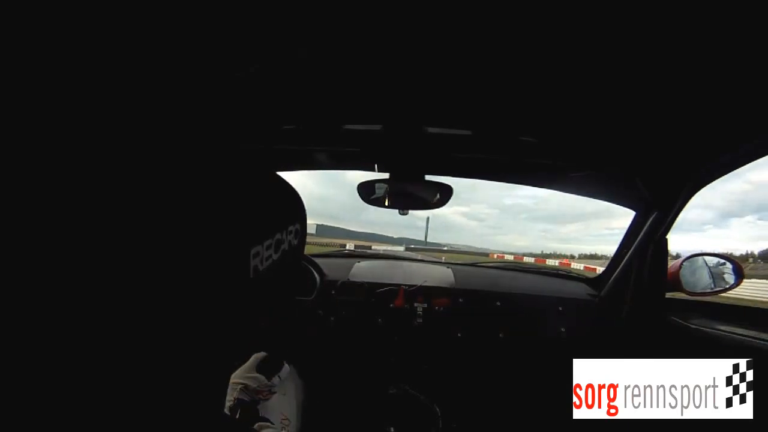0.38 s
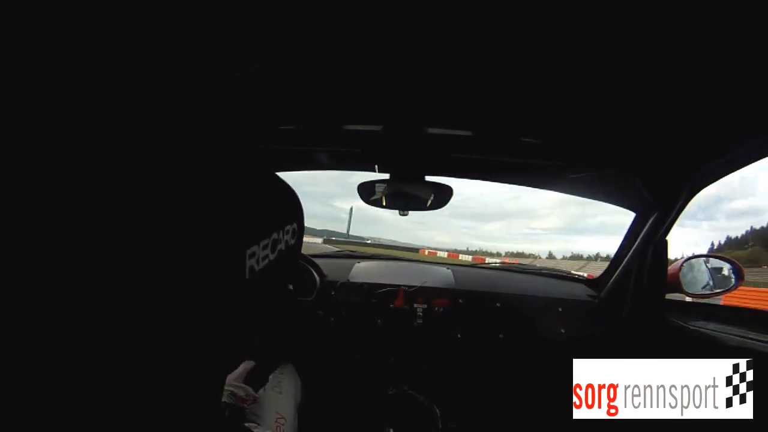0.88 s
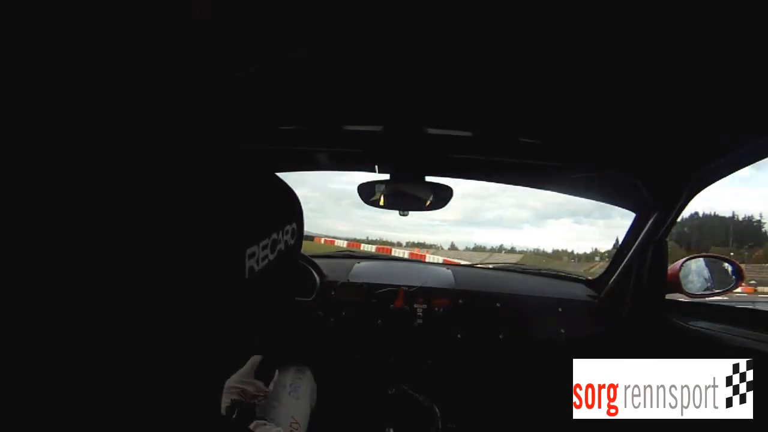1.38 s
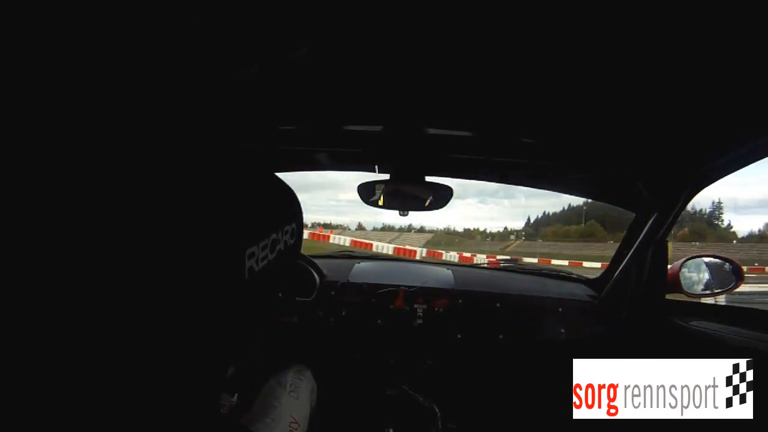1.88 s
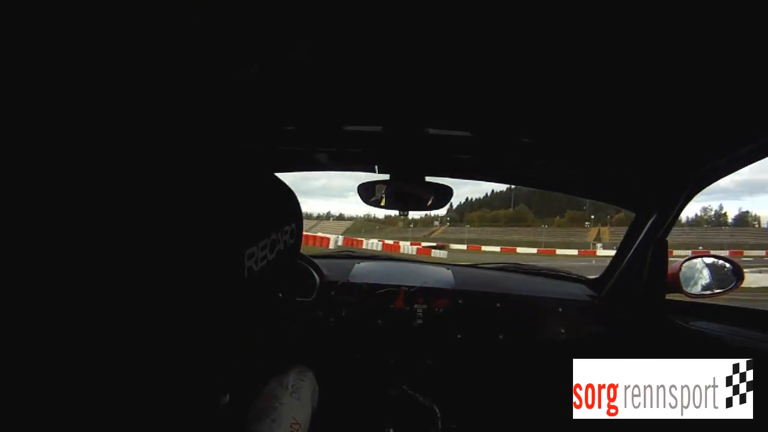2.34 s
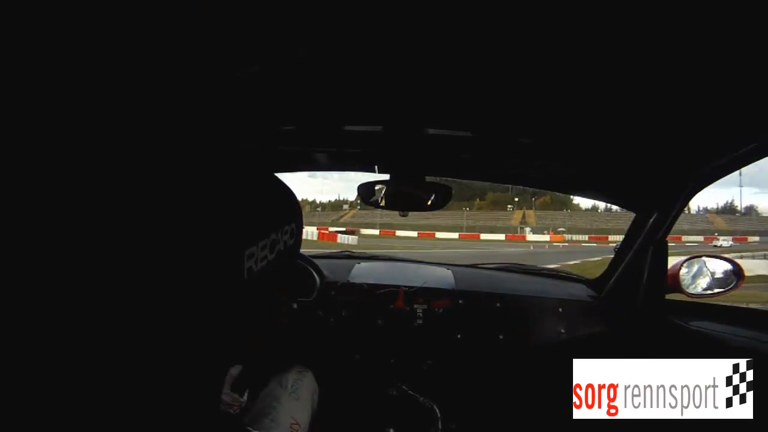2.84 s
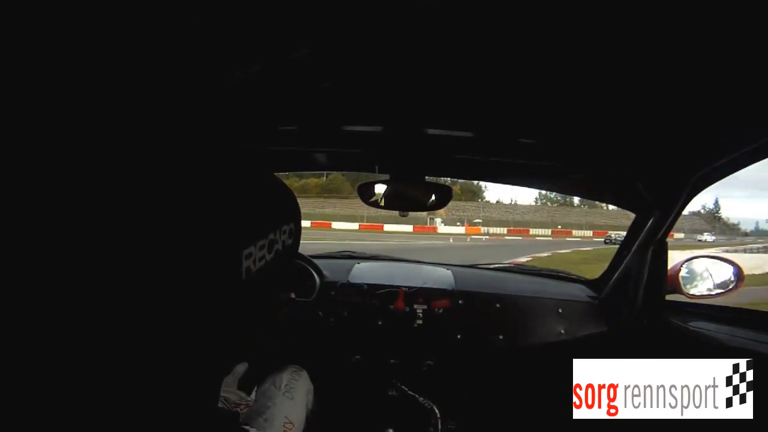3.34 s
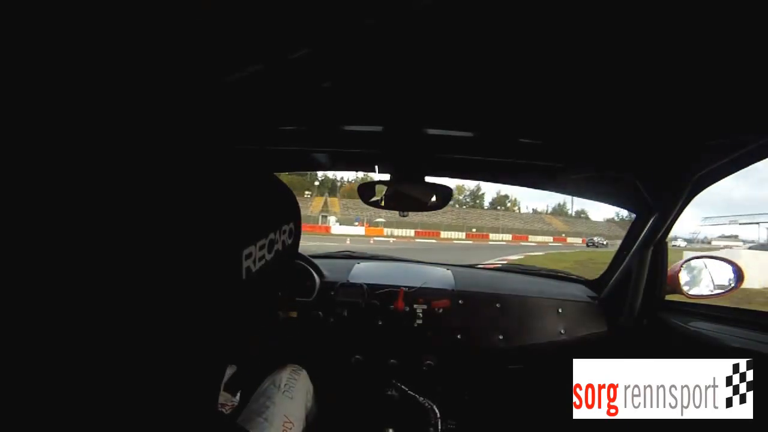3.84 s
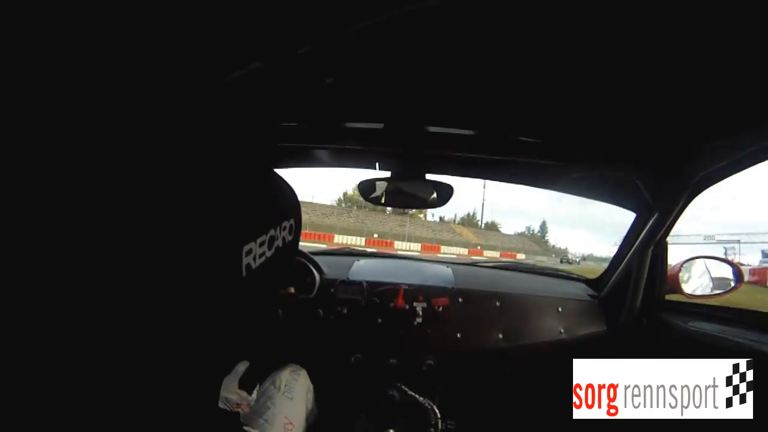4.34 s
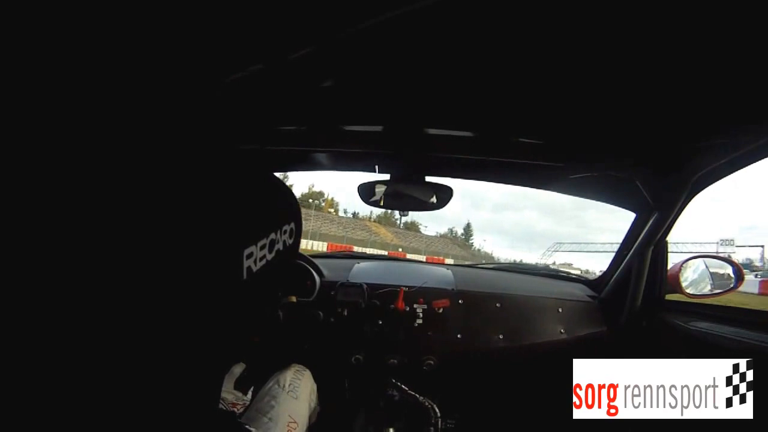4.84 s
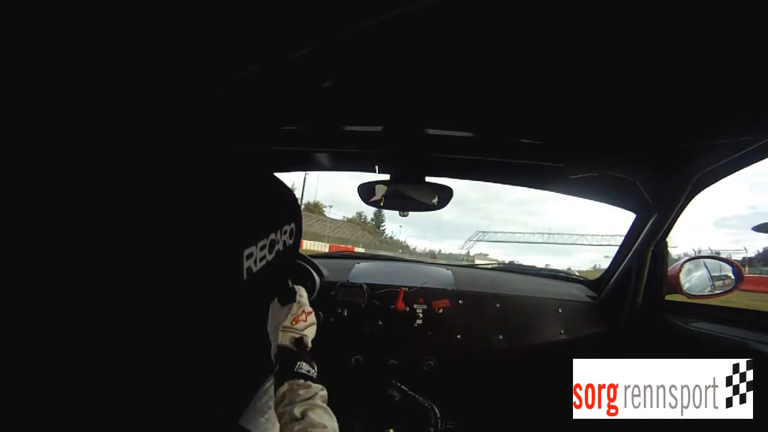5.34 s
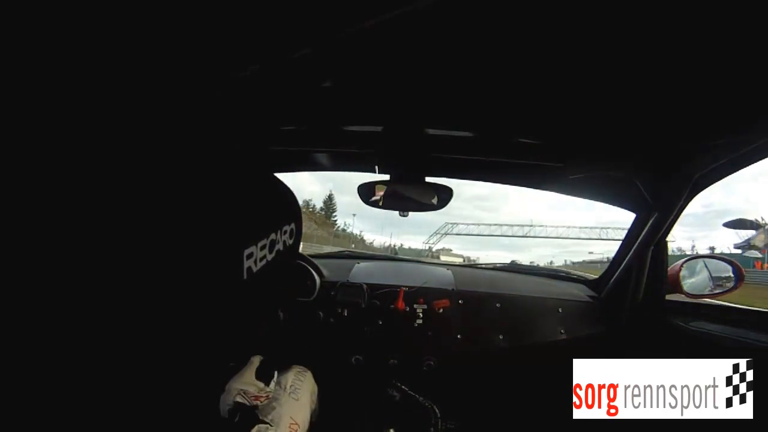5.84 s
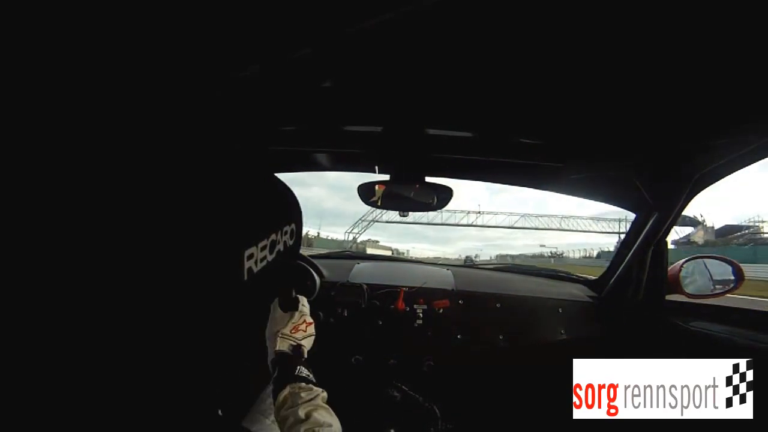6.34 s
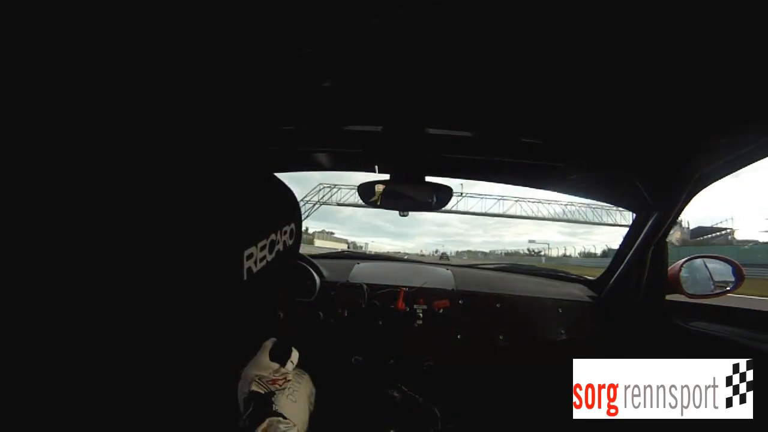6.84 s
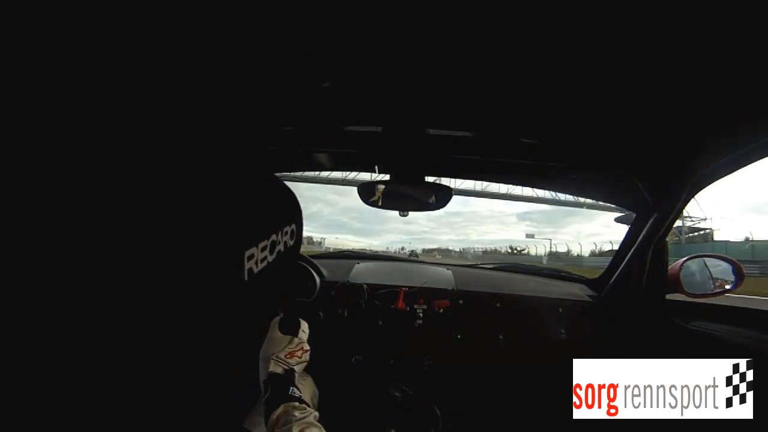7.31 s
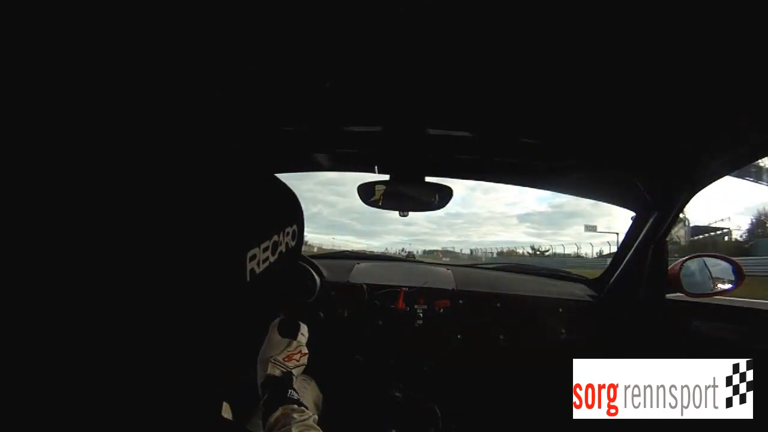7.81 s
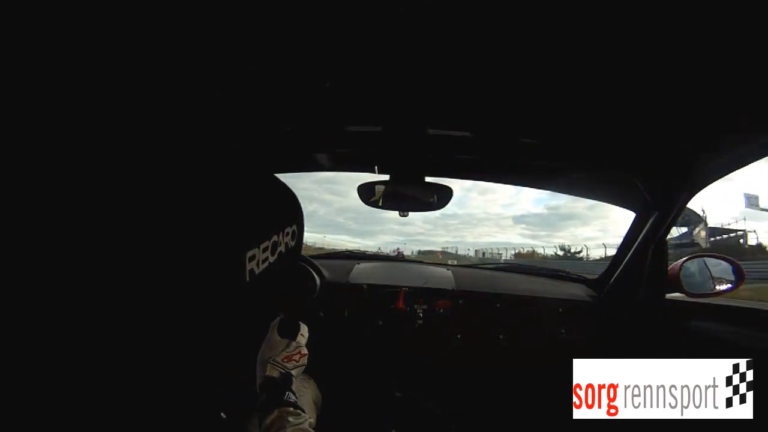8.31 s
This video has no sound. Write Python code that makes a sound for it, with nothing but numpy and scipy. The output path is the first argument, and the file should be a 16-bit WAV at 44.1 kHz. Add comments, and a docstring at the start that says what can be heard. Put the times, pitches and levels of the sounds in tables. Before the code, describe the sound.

Inside a stripped racing car, a small microphone with levelled loudness and gritty treble picks up a continuous engine. From 0 to 0.6 s the low, buzzing firing note falls in pitch, briefly wobbling upward, while its boom cuts out in jolts and kerb rumble thuds. It sinks further until about 1.8 s, duller, over road roar, with sparse faint trim ticks between 0.95 and 2.3 s. From 2 s the throttle eases open; pitch rises slowly and the tone fills out, with kerb bumps around 4.5 to 4.8 s. At 5.1 s it flares brighter and raspier, peaking near 5.45, then drops abruptly by 5.75. It surges again to 6.5 s, dips around 6.9, recovers, wavers near 7.5, and climbs to a loud metallic howl at 8.7 s. Gear whine follows the revs; hiss swells with load, and a very faint steady electrical tone sits underneath.

```python
"""Inside a stripped racing car: the engine falls on the overrun into a bend, its boom dropping out in jolts.
Loose trim ticks, then the throttle opens and the engine pulls, flares, dips and climbs out of the bend.
Firing pulses boom as clean orders and ring the panel and intake resonances; a gear whines along with the revs.
Filtered noise makes road roar, kerb rumble and combustion hiss, and a faint electrical tone holds steady. A small
camera evens the level and holds each sample at a low rate, which mirrors the sound into the treble."""
import sys
import numpy as np
from scipy import signal
from scipy.fft import rfft, irfft, next_fast_len
from scipy.io import wavfile
from scipy.ndimage import uniform_filter1d

SR = 44100
rng = np.random.default_rng(int(sys.argv[2]) if len(sys.argv) > 2 else 0)


def natural_amplitude(level_db):
    """Convert a level in decibels to a linear amplitude factor, elementwise."""
    exponent = np.asarray(level_db, float) / 20
    return 10 ** exponent


def master_out(mix):
    """Clip the mix to full scale and print it as 16-bit PCM to the path in sys.argv[1]."""
    frames = np.transpose(np.atleast_2d(mix))
    ceiling = np.clip(frames, -1, 1)
    pcm = np.round(ceiling * 32767).astype(np.int16)
    wavfile.write(sys.argv[1], SR, pcm)


N = 383229   # length [samples]

# Levels of all sources are those ahead of the gain control.
# noise colours, each scaled as a whole afterwards: (frequency [Hz], relative density [dB per Hz])
RUMBLE_COLOUR = [(20, 4), (40, -3), (70, 1), (110, 3), (180, 2), (300, -9.5), (500, -9), (800, -31)]
ROAR_COLOUR = [(120, -22), (250, -1), (500, -0.5), (800, -2), (1050, -8.5), (1300, -14), (1700, -19.5),
               (2200, -41)]
HISS_COLOUR = [(1200, -8.5), (1800, -4.5), (2500, -0.5), (3100, -6), (3600, -5), (4500, -14), (5300, -16),
               (6200, -14), (7200, -15.5), (8500, -16.5), (11000, -21.5)]
# kerbs and bumps under the wheels: (middle [s], half length [s], rumble swell [dB], roar swell [dB])
BUMPS = [(0.0, 0.13, 10, 2), (.39, 0.11, 12, 1), (.52, 0.09, 9, 0), (2.03, .12, 5, 3), (3.55, 0.25, 3, 3),
         (4.5, 0.11, 10, 1.5), (4.75, 0.18, 10.5, 0.5), (5.55, 0.054, 3, 0), (6.5, 0.049, 3, -1),
         (7.1, .2, 2, 0), (7.75, 0.22, 5, -1.5)]
# trim rattling: (time [s], relative strike level [dB])
TICKS = [(0.9502, -28), (1.1383, -30), (1.9047, -27), (2.0852, -24), (2.2711, -25.5)]
# resonances of the struck trim: (frequency [Hz], relative level [dB], 60 dB decay time [s])
TICK_MODES = [(1698, -11, .012), (2699, 4, 0.017), (3383, -1, 0.056), (4030, -7, 0.0093)]
# panel and intake resonances: (frequency [Hz], width [Hz], relative level [dB])
CABIN_MODES = [(985, 67, 12.5), (1116, 180, 1.5), (1222, 43, 5.5), (1446, 86, -4.5), (1634, 36, 0.5),
               (1966, 20, 3.5), (2146, 12, 3), (2278, 26, 5), (2456, 34, -3.5), (2608, 31, 0.5),
               (2723, 10.3, 2.5), (2876, 81, -3.5), (3236, 42, -4), (3640, 200, -20)]
# engine load: (time [s], combustion hiss [dB], metallic ring of the firing pulses [dB])
LOAD = [(0.0, -43.5, -39), (0.22, -49.5, -49), (0.36, -46.5, -44), (0.52, -48, -46), (0.62, -48, -53),
        (1.16, -51.5, -51.5), (1.8, -53.5, -51.5), (2.1, -47, -61), (2.17, -50, -50), (2.42, -53, -58),
        (2.78, -51.5, -48), (3.65, -45.5, -42.5), (3.8, -47.5, -42.5), (4.35, -46.5, -40), (4.7, -41, -38),
        (4.82, -41, -35), (4.96, -46, -41), (5.13, -43.5, -30.5), (5.35, -40, -27.5), (5.56, -39.5, -28.5),
        (5.63, -43.5, -33), (5.74, -46.5, -39), (5.93, -44.5, -32.5), (6.1, -43, -30.5), (6.5, -36, -24),
        (6.72, -39.5, -28), (6.85, -38, -26), (6.95, -39.5, -27.5), (7.43, -36.5, -25.5), (7.55, -40, -27),
        (7.9, -35.5, -23.5), (8.2, -39, -30), (8.69, -39, -25.5)]
# engine speed: (time [s], firing rate [Hz])
REVS = [(0,118),(.2,111.3),(.33,102.2),(.41,110.7),(.5,103.8),(.63,98.9),(.84,91.7),(.96,89.4),(1.44,90),(1.55,86.6),(1.74,85.3),(2.0,86.85),(2.18,88.54),(2.58,88.9),(2.88,94),(3.05,94.25),(3.25,98.1),(3.36,97.25),(3.46,101.4),(3.65,101.7),(3.76,103.3),(4.25,107.2),(4.45,110.9),(4.55,109),(4.75,114.7),(5.03,115.3),(5.12,123.1),(5.2,126),(5.28,131.5),(5.4,132.2),(5.46,139.1),(5.77,118.4),(6.07,120.7),(6.37,138.3),(6.46,142.1),(6.6,141.3),(6.9,132),(7.12,139.2),(7.38,143.1),(7.5,140),(7.65,142),(8.15,148.9),(8.69,156.9)]
# engine state; 0 overrun, 1 part throttle, 2 full throttle, 3 full with the intake switched for high revs;
# anything above 3 sounds like 3: (time [s], state [0 upward])
THROTTLE = [(0, 0), (1.89, 0), (1.96, 0.43), (2.08, 0.7), (2.18, 1.0), (2.72, 1.0), (2.8, 1.3), (3.1, 1.34),
            (3.22, 2.0), (7.8, 2.0), (8.0, 3.0), (8.69, 9)]
# orders 1 to 9 of the firing rate, at 120 Hz: (overrun [dB], part throttle [dB], full throttle [dB],
# full with switched intake [dB], growth with revs [dB per octave])
ORDERS = [(-11.5, -16, -12.5, -22, 5), (-20.7, -13.9, -17, -12, -8.2), (-36.5, -45, -23, -27, 10),
          (-44, -38, -25, -29.5, 1), (-41.5, -26, -28, -29, -3), (-63, -57.5, -56.5, -37, -22.5),
          (-55, -38, -32.5, -32, 24.5), (-65, -61, -49, -50, -10.5), (-59.5, -64, -38.5, -32, -10)]
# booms and dead spots at the seat, met by each order as it sweeps:
# (frequency [Hz], half width [Hz], level change [dB])
SEAT = [(122.0, 5.7, 4.5), (164, 25.2, -21.5), (175.2, 14.7, 13), (198.4, 3.4, -12.5), (225.4, 11.8, -12.5),
        (322.6, 24, 4.5), (375.6, 16.5, -6.5), (440.7, 3.7, -3), (460, 14, 4.5), (484.7, 7.3, -11.5),
        (530, 6.6, 5), (591, 7.7, 11), (603, 1.2, -9), (666.4, 5.8, -12.5), (691.4, 13, 11.5),
        (713.7, 8.2, 7), (738, 13.4, -7), (754, 11, 7.5), (838, 22, 8.5), (851, 7.7, -4), (877, 3.8, -13.2),
        (963, 16.6, -13), (1008.3, 35, 9.5), (1097, 36.9, -26), (1217, 15.1, 9.5), (1300, 21, 9.5),
        (1332, 16.3, -16)]
# revs at which one order alone swells or fades, listed by order:
# (firing rate [Hz], half width [Hz], level change [dB])
TUNED_REVS = {2: [(94, 2.9, 2), (129, 2.4, 2.5)], 5: [(91.2, 4.52, -17.5), (116.56, 2.7, -10.5)],
              6: [(103.6, 6.3, 12.4), (116.5, 2.1, -19), (134.4, 8.9, 26)], 8: [(137.4, 8.8, 21.5)],
              9: [(113.8, 2.5, -11), (121.5, 2.2, 17), (126.6, 1.8, 12.5)]}
# the boom drops out briefly as the car jolts: (middle [s], half length [s], level change [dB])
DROPOUTS = [(.27, 0.045, -8), (.415, 0.02, -14), (.485, 0.021, -17), (.585, 0.023, -8), (1.495, 0.013, -11)]
# lines between the orders, from cylinders that differ over the six-firing cycle:
# (frequency [sixths of the firing rate], level against order 3 [dB])
BETWEEN = [(7, -14.5), (8, -20), (13, -33.5), (28, -18.5), (31, -15), (40, -25)]


def rms_one(x):
    """Scale to rms 1."""
    return x / np.sqrt(np.mean(x ** 2) + 1e-20)


def band_rms_one(x, low_hz, high_hz):
    """Scale so that the band between the edges has rms 1."""
    band_pass = signal.butter(4, [low_hz, high_hz], "band", fs=SR, output="sos")
    return x / np.sqrt(np.mean(signal.sosfilt(band_pass, x) ** 2))


def in_time(rows):
    """Columns of a table, sample by sample."""
    s, *columns = np.transpose(rows)
    return [np.interp(np.arange(N) / SR, s, c) for c in columns]


def swells(rows):
    """Sum of bell-shaped swells in dB, one sum for each level column."""
    t = np.arange(N) / SR
    return sum(np.exp(-((t - s) / half) ** 2) * np.array(db)[:, None] for s, half, *db in rows)


def peaks_db(hz, rows):
    """Sum of resonance-shaped peaks and dips in dB."""
    return sum(db / (1 + ((hz - centre_hz) / half) ** 2) for centre_hz, half, db in rows)


def drift(rate_hz):
    """Slow random wander of spread 1: noise through two equal low-pass poles at the given rate."""
    r = np.exp(-40 * np.pi * rate_hz / SR)   # computed on every 20th sample
    white = rng.standard_normal(N // 20 + 4002)
    slow = signal.lfilter([1], [1, -2 * r, r * r], white)[4000:]   # skip the settling
    return np.interp(np.arange(N) / 20, np.arange(len(slow)), rms_one(slow))


def banded_noise(colour, patchy_db):
    """Third-octave bands of noise that flicker in level, partly together and partly each on its own."""
    hz, db = np.transpose(colour)
    edges = 18 * 2 ** np.arange(0, 9.5, 1 / 3)
    white = rng.standard_normal((2, N))   # neighbouring bands take turns, so they stay independent
    together, out = drift(7.6), np.zeros(N)
    for k, (low, high) in enumerate(zip(edges, edges[1:])):
        if .8 * hz[0] < low < hz[-1]:
            band_pass = signal.butter(2, [low, high], "band", fs=SR, output="sos")
            band = signal.sosfilt(band_pass, white[k % 2])
            level_db = np.interp(np.log(low * high) / 2, np.log(hz), db)
            flicker_db = patchy_db * (together + 1.05 * drift(16.4))
            out += band * natural_amplitude(level_db + flicker_db)
    return out


def cabin(x):
    """Parallel resonances; alternating signs keep the valleys between them filled."""
    out = np.zeros(N)
    for k, (hz, width, db) in enumerate(CABIN_MODES):
        r = np.exp(-np.pi * width / SR)
        a = [1, -2 * r * np.cos(2 * np.pi * hz / SR), r * r]
        b = [(1 - r * r) / 2, 0, (r * r - 1) / 2]
        out += (-1) ** k * natural_amplitude(db) * signal.lfilter(b, a, x)
    return out


def electrical_whine(hz=3750, rms_db=-66):
    """A faint steady electrical sine."""
    return np.sqrt(2) * natural_amplitude(rms_db) * np.sin(2 * np.pi * hz * np.arange(N) / SR)


def road(rumble_db=-44.5, roar_db=-47, split_hz=700, low_follows=0.47, high_follows=0.64):
    """Floor rumble and the broad roar of tyres and air, swelling over bumps; roar follows part of the hiss."""
    rumble_swell_db, roar_swell_db = swells(BUMPS)
    rumble = band_rms_one(banded_noise(RUMBLE_COLOUR, patchy_db=0.5), 23, 60.7)
    roar = band_rms_one(banded_noise(ROAR_COLOUR, patchy_db=1.0), 1279, 1980)
    low = signal.sosfiltfilt(signal.butter(2, split_hz, fs=SR, output="sos"), roar)
    hiss_swing_db = in_time(LOAD)[0] + 45   # the roar level holds for hiss at -45 dB
    roar = natural_amplitude(low_follows * hiss_swing_db) * low + natural_amplitude(high_follows * hiss_swing_db) * (roar - low)
    return natural_amplitude(rumble_db + rumble_swell_db) * rumble + natural_amplitude(roar_db + roar_swell_db) * roar


def trim_ticks():
    """Short rattles of loose trim: each click strikes a set of decaying resonances."""
    clicks, out = np.zeros(N) + 1e-18, np.zeros(N)
    for s, db in TICKS:
        clicks[round(s * SR)] = natural_amplitude(db - 9.0)
    for hz, db, t60 in TICK_MODES:
        r, w = natural_amplitude(-60 / (t60 * SR)), 2 * np.pi * hz / SR
        out += natural_amplitude(db) * signal.lfilter([0, np.sin(w)], [1, -2 * r * np.cos(w), r * r], clicks)
    return out


def combustion_hiss(phase):
    """Gas and valve noise that swells a little on every firing and partly rings the panels."""
    noise = banded_noise(HISS_COLOUR, patchy_db=1.0) * (1 + .13 * np.cos(phase))
    heard = noise + natural_amplitude(-3) * cabin(noise)
    return natural_amplitude(in_time(LOAD)[0]) * band_rms_one(heard, 3290, 5800)


def gear_whine(phase, order=19, rms_db=-12, waver_db=3.5, high_db=-7.5):
    """A gear mesh sings at a multiple of the firing rate, set against the ring; softer once the intake switches."""
    switched = np.clip(in_time(THROTTLE)[0] - 2, 0, 1)
    level_db = rms_db + high_db * switched + waver_db * drift(7.1)
    return np.sqrt(2) * natural_amplitude(level_db) * np.cos(order * phase)


def firing_phase():
    """Firing rate [Hz] and the phase [rad] it runs up, one turn a firing."""
    hz, = in_time(REVS)
    return hz, 2 * np.pi * np.cumsum(hz) / SR


def order_sizes(hz):
    """Height of each order: pedal sets the source, revs feed it, the cabin colours it and jolts cut it."""
    pedal, sizes = in_time(THROTTLE)[0], []
    for k, (*state_db, growth_db) in enumerate(ORDERS, 1):
        signs = [-1 if k == 1 else 1, 1, 1, 1]   # order 1 turns over as overrun ends
        source = np.interp(pedal, [0, 1, 2, 3], natural_amplitude(np.array(state_db)) * signs)
        seat_db = peaks_db(k * hz, SEAT) + peaks_db(hz, TUNED_REVS.get(k, []))
        sizes.append(source * natural_amplitude(seat_db + growth_db * np.log2(hz / 120)))
    return np.array(sizes) * natural_amplitude(swells(DROPOUTS))


def engine_boom(hz, late, waver_db=0.5, flutter_db=1.0, between_waver_db=3):
    """Low orders of the firing rate, with fainter lines between them from unequal cylinders."""
    sizes = order_sizes(hz)
    # the orders line up into one pulse a firing: a lopsided push at low revs, a sharp suction dip near 145 Hz
    skew = np.pi * (hz - 55) / 90
    boom = np.zeros(N)
    for k, size in enumerate(sizes, 1):
        # higher orders flutter more and slip further out of line
        level = size * natural_amplitude(waver_db * drift(16.5) + flutter_db * np.log(k) * drift(6.3))
        boom += level * np.cos(k * late + skew + k / 5 * drift(1))
    load = uniform_filter1d(sizes[2], size=12000)   # smoothed height of order 3
    for sixths, db in BETWEEN:
        boom += load * natural_amplitude(db + between_waver_db * drift(3.3)) * np.cos(round(sixths) * late / 6)
    return np.sqrt(2) * boom


def firing_pulses(phase, late, uneven_db=2.0, cylinders=0.029):
    """Sharp pulses from orders 10 to 33, uneven by chance and in a pattern that repeats every six firings."""
    pattern = 1 + cylinders * sum(np.cos(m * phase / 6 + m * m) for m in range(1, 4))
    return -sum(np.cos(k * late) for k in range(10, 34)) * pattern * natural_amplitude(uneven_db * drift(30.0))


def engine(hz, phase, jitter=0.0036):
    """Booming low orders plus firing pulses that ring the panels and intake, with the gear on top."""
    late = phase + 2 * np.pi * jitter * drift(50.0)   # combustion timing scatters; jitter in firing periods
    boom = engine_boom(hz, late)
    ring = band_rms_one(cabin(firing_pulses(phase, late)), 1011, 4500)
    return boom + natural_amplitude(in_time(LOAD)[1]) * (ring + gear_whine(phase))


def scene():
    """Everything reaches one microphone."""
    hz, phase = firing_phase()
    background = electrical_whine() + road() + trim_ticks()
    return (background + combustion_hiss(phase) + engine(hz, phase))[None]


def levelled(x, share=0.54, reaction_s=0.032, aim_db=-14):
    """Gain control: a share of the running level's distance from its aim is taken back."""
    r = np.exp(-1 / (reaction_s * SR))
    power = signal.lfilter([1 - r], [1, -r], x ** 2, zi=[[natural_amplitude(2 * aim_db)]])[0]
    return x * natural_amplitude(-share * (10 * np.log10(power) - aim_db))


def sample_hold(x, hold_hz=11997.5, mirror_cut_hz=4300):
    """Samples held at a low rate leave a mirror image of the lower band below that rate, weaker toward the top."""
    band = signal.sosfilt(signal.butter(4, mirror_cut_hz, fs=SR, output="sos"), x)
    mirror = band * 2 * np.cos(2 * np.pi * hold_hz * np.arange(N) / SR)
    size = next_fast_len(N)
    hz = np.arange(1, size // 2 + 2) * SR / size
    slope = np.clip(hold_hz / hz - 1, 0, 1)   # a hold weighs the image of f by f / (rate - f)
    top = 1 / (1 + (hz / 10900) ** 150)   # the output filter ends the band steeply
    dip = natural_amplitude(-7.0 * np.exp(-((hz - 6150) / 450) ** 2))   # a narrow trough where band and image meet
    return irfft((rfft(x, size) + slope * rfft(mirror, size)) * top * dip, size)[:, :N]


def low_pass(x):
    """Removes everything above the highest recorded frequency."""
    return signal.sosfilt(signal.butter(12, 11230, fs=SR, output="sos"), x)


def record(dry):
    """The camera evens the level, then holds each sample at its low rate."""
    held = sample_hold(levelled(dry))
    return low_pass(held)


dry = scene()
out = record(dry)
master_out(out)
```